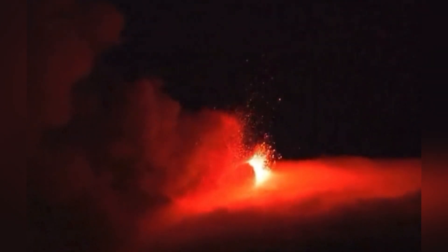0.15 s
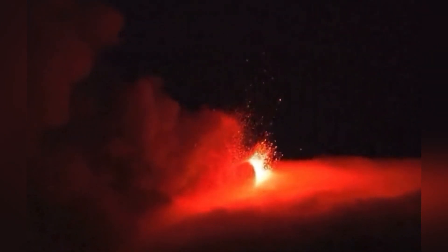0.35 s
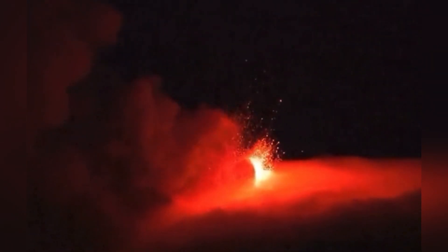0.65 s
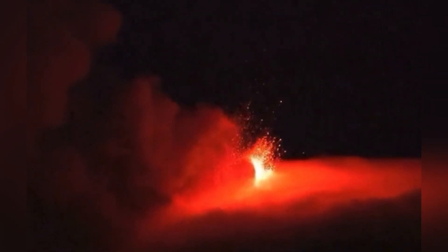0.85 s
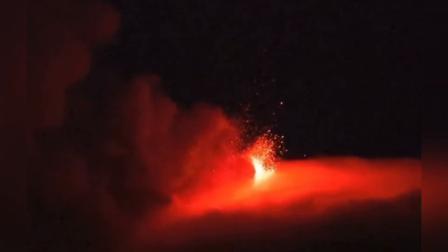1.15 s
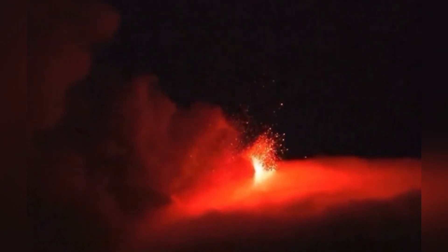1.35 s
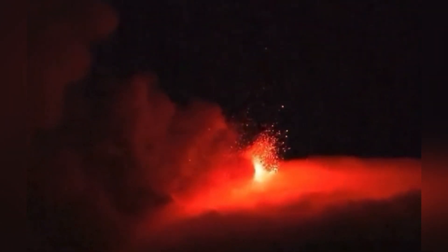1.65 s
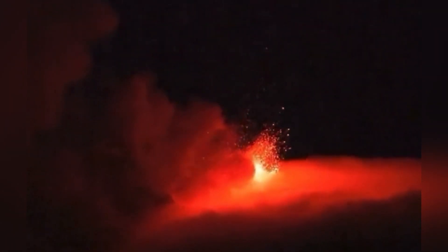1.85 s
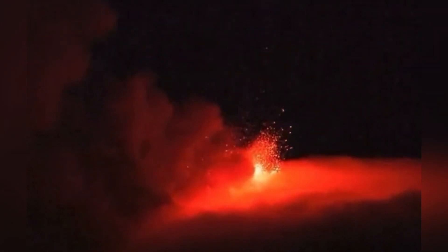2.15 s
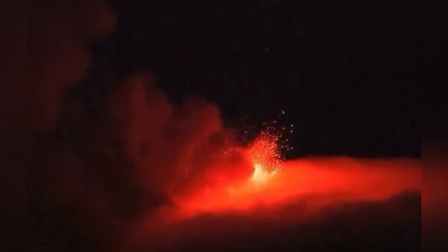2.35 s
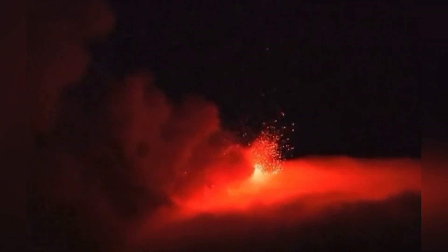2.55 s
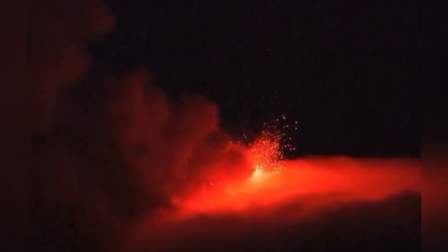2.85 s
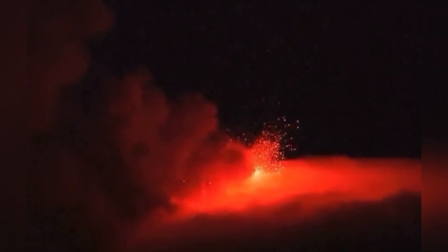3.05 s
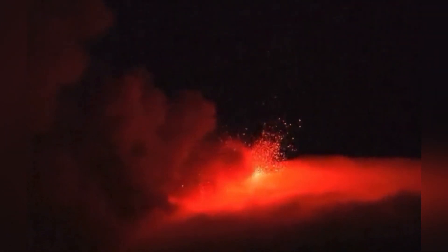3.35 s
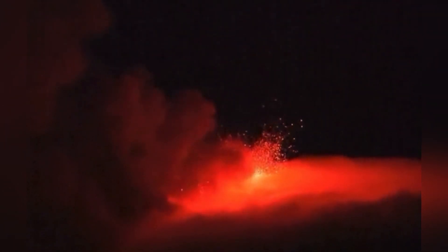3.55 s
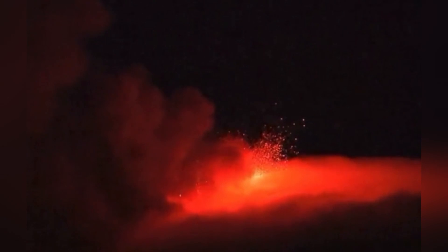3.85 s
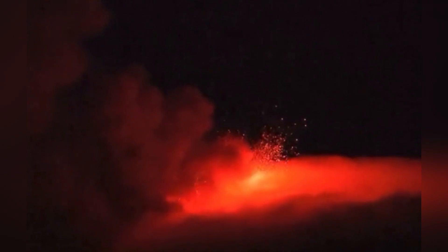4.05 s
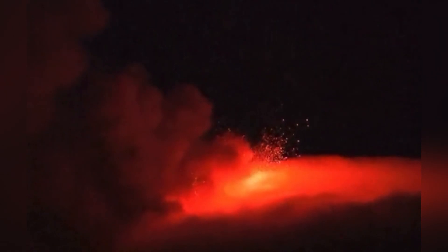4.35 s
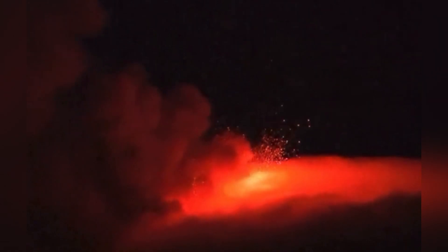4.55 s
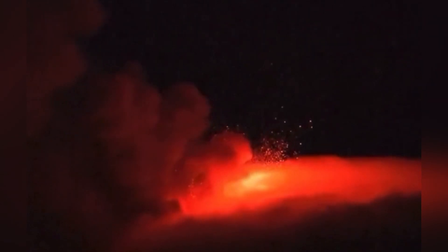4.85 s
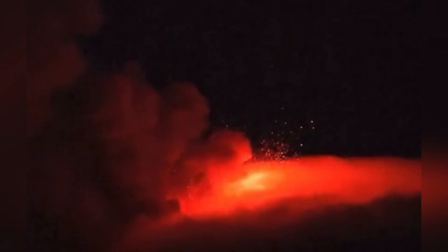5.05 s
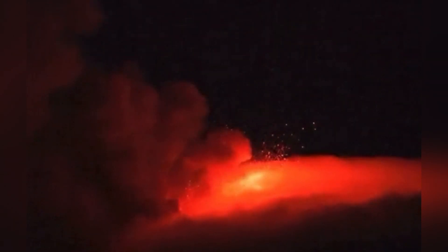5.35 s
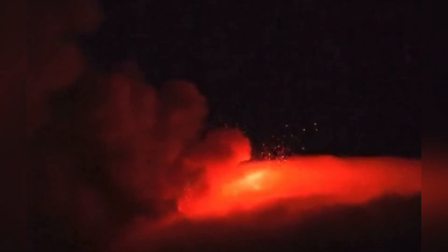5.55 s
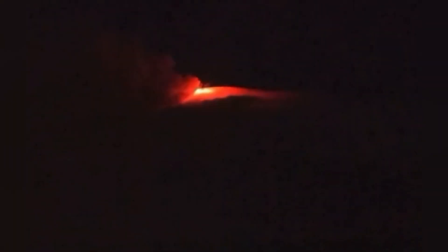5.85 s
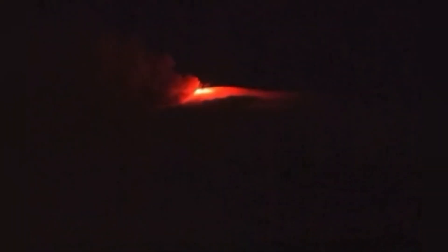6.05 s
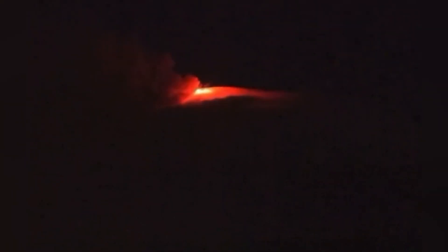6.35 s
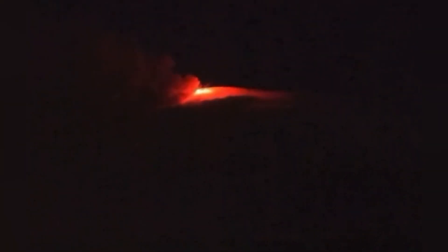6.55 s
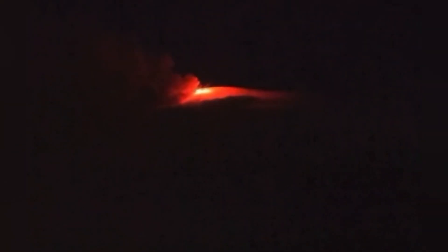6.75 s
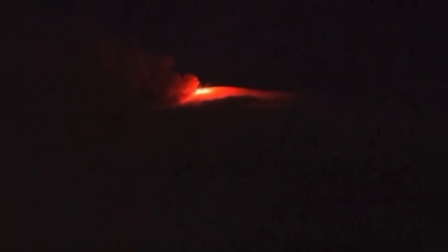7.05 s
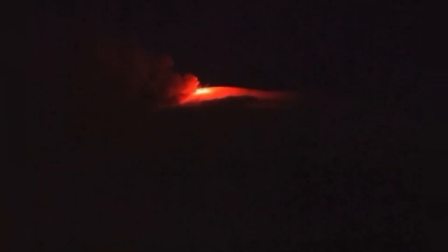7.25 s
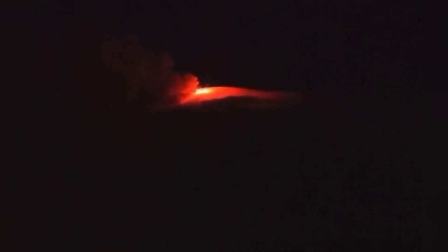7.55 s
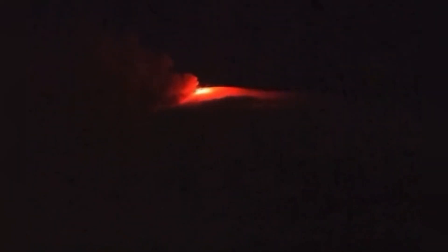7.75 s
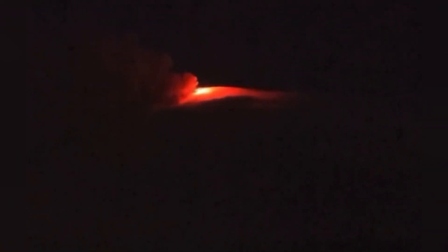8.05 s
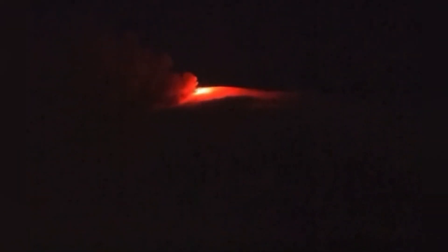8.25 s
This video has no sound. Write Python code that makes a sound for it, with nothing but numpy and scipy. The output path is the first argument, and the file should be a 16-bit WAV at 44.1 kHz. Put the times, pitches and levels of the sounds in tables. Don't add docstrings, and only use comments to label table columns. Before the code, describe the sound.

Low, overloaded wind rumble dominates first, mixed with broad tyre hiss from close passing cars and small road-joint knocks. A heavy diesel slows behind a wall, then pulls clear, brighter and rising in pitch. The sound switches abruptly with a faint click to a smooth, wavering low engine hum fading away, with soft knocks, far dull roar and faint hiss. One handheld camera microphone outdoors, without windshield, with slightly ragged treble.

```python
import sys
import numpy as np
from scipy import signal
from scipy.io import wavfile
from scipy.ndimage import uniform_filter1d

SR = 44100
rng = np.random.default_rng(int(sys.argv[2]) if len(sys.argv) > 2 else 0)


def invert_db(level):
    return 10 ** (np.asarray(level, dtype=float) / 20)


def master(y):
    cut = np.clip(np.atleast_2d(y).T, -1, 1)
    pcm = np.round(cut * 32767)
    wavfile.write(sys.argv[1], SR, pcm.astype(np.int16))


N = 371318
CUT = 5.788


def evened(x):
    return x / np.sqrt(np.mean(x ** 2) + 1e-20)


def columns(rows, t):
    s, *values = np.transpose(rows)
    return [np.interp(t, s, v) for v in values]


def during(rows, fade_in, fade_out):
    t = np.arange(N) / SR
    rise = np.clip((t - rows[0][0]) / fade_in, 0, 1)
    return rise * np.clip((rows[-1][0] - t) / fade_out, 0, 1)


def bump(t, s, half):
    return np.exp(-((t - s) / half) ** 2)


def wander(per_s, count):
    steps = rng.standard_normal(count // 64 + 2)
    slow = signal.sosfilt(signal.butter(2, per_s, fs=SR / 64, output="sos"), steps)
    return np.interp(np.arange(count) / 64, np.arange(len(slow)), evened(slow))


def noise(colour, patchy_db, shape=None, size=1024):
    hop = size // 4
    t = np.arange(N // hop + 5) * hop / SR
    hz = np.fft.rfftfreq(size, 1 / SR)[:, None]
    a, b, patches = rng.standard_normal((len(t), len(hz), 3)).T
    patches = uniform_filter1d(uniform_filter1d(patches, size=8, axis=0), size=10, axis=1)
    patches = patchy_db * evened(patches)
    f, db = np.transpose(colour)
    smooth = np.interp(np.log(hz + 1), np.log(f + 1), db) + (shape(t, hz) if shape else 0)
    loudness = 10 * np.log10((invert_db(smooth + 0 * patches) ** 2).sum(0))
    field = smooth + patches - loudness
    return evened(signal.istft((a + 1j * b) * invert_db(field), nperseg=size, noverlap=size - hop)[1][:N])


def resonate(x, hz, width):
    turn = np.exp(2j * np.pi * hz * np.arange(len(x)) / SR)
    r = np.exp(-np.pi * width / SR)
    return 2 * (turn * signal.lfilter([1 - r], [1, -r], x / turn)).real


def tones(rows, multiples, levels_of, waver_db, drift=1e-4):
    start = round(rows[0][0] * SR)
    t = np.arange(start, min(round(rows[-1][0] * SR), N)) / SR
    hz, *levels_db = columns(rows, t)
    turns = np.cumsum(hz * (1 + drift * wander(30., count=len(t)))) / SR
    out = np.zeros(N)
    for k, db in zip(multiples, levels_of(t, *levels_db)):
        level = np.sqrt(2) * invert_db(db + waver_db * wander(3.7, count=len(t)))
        out[start:][:len(t)] += level * np.sin(2 * np.pi * (k * turns + rng.random()))
    return out


def wind(t):
    # frequency in Hz, density in dB per Hz.
    eddy_colour = [(8.8, -36), (15, -13), (38, 6), (62, 0.5), (93, -7.5), (190, -29), (250, -69),
                   (420, -120)]
    # time in seconds, level in dB.
    breeze_levels = [(0, -30), (.95, -26), (1.2, -31), (2.3, -32), (2.93, -33.5), (3.2, -41.5),
                     (4.6, -40.5), (5, -42), (5.78, -44), (5.8, -40.5), (6.8, -51.5), (8.42, -45)]
    # peak in seconds, level in dB, half length in seconds, upper-bass flutter in dB.
    puffs = [(0, -29, 0.065, 4), (0.15, -25, 0.06, -2), (.255, -19.5, 0.038, 5), (0.466, -23.5, 0.055, 9),
             (.64, -22, 0.077, 7), (0.767, -14, 0.02, -7), (0.886, -23.5, 0.082, -4), (1.01, -26, 0.041, 3),
             (1.45, -24.5, .025, .1), (1.553, -25.5, 0.042, -0.5), (1.725, -29, 0.12, 6),
             (1.888, -26.5, 0.18, -2), (2.127, -31.5, 0.11, 5), (2.372, -28, .05, 3.5),
             (2.528, -19, 0.018, -14), (2.676, -31.5, .05, -8), (2.847, -29.5, 0.037, -9),
             (3.1, -40, .06, -9), (3.4, -37.5, .08, -2), (4.21, -35, 0.036, .1), (4.484, -38, 0.088, -1),
             (4.59, -35.5, 0.068, -7), (5.39, -28.5, 0.092, -1.5), (5.56, -30, 0.14, -5.5),
             (5.706, -30, 0.026, -11), (6.223, -43, .05, -7), (6.66, -37.5, 0.086, 14),
             (8.063, -42, 0.19, 3)]
    breeze_flutter_db = 4

    def strength(s):
        at, db, half, lift_db = np.transpose(puffs)[:, :, None]
        breeze = invert_db(2 * columns(breeze_levels, s)[0])
        gusts = invert_db(2 * db) * bump(s, at, half)
        power = breeze + gusts.sum(0)
        return 10 * np.log10(power), (breeze_flutter_db * breeze + (lift_db * gusts).sum(0)) / power

    def flutter(s, hz):
        return strength(s)[1] * np.exp(-np.log2((hz + 1) / 105) ** 2 / .45)

    eddies = noise(eddy_colour, patchy_db=0.0, shape=flutter, size=4096)
    lumps = np.sqrt(uniform_filter1d(eddies ** 2, size=3000) + 0.042)
    level_db = np.interp(t, t[::64], strength(t[::64])[0]) + 1.5
    return invert_db(level_db) * evened(eddies / lumps ** 0.54)


def cars(t):
    # closest in seconds, tyre noise in dB, distance over speed in seconds,
    # tread hump in Hz, treble lift in dB per octave.
    passes = [
        (.08, -40.5, 0.45, 1245, -1),
        (.58, -42.5, 0.11, 1250, 1),
        (1.25, -45.5, 0.9, 1170, 2.5),
        (1.83, -39.5, 0.38, 1218, 1.5),
        (2.4, -42, 0.19, 1130, 0.8),
        (3.05, -47.5, 0.65, 1000, -3),
        (3.95, -47, .3, 1200, -0.5),
        (4.8, -52, .2, 1600, -3),
    ]
    # frequency in Hz, density in dB per Hz.
    tyre_colour = [(240, -33), (400, -13), (501, -3), (618, -13), (874, -5), (956, 2), (1200, -3),
                   (1410, 1), (1740, -1), (3590, -18), (5220, -27), (11400, -41), (14500, -47)]
    doppler, hump_from_db, hump_per_db, gone_s = 0.075, -45, 2, 4.33

    def traffic(s):
        at, db, scale, hump_hz, lift_db = np.transpose(passes)[:, :, None]
        past = (s - at) / scale
        power = invert_db(2 * db) / (1 + past ** 2) ** 1.61
        share = power / power.sum(0)
        heard_hz = hump_hz * (1 - doppler * past / np.sqrt(1 + past ** 2))
        return 10 * np.log10(power.sum(0)), (share * heard_hz).sum(0), (share * lift_db).sum(0)

    def nearness(s, hz):
        db, hump_hz, lift_db = traffic(s)
        hump_db = np.maximum(hump_per_db * (db - hump_from_db), -4)
        hump = hump_db * np.exp(-((hz - hump_hz) / 120) ** 2)
        return hump + lift_db * np.log2(np.maximum(hz / 1500, 1))

    hiss = noise(tyre_colour, patchy_db=1.04, shape=nearness)
    return invert_db(traffic(t)[0]) * hiss * np.clip((gone_s - t) / 0.44, 0, 1)


def tappets(t):
    # ring in Hz, width in Hz, level in dB.
    head_rings = [(5030, 1400, -2), (7430, 760, -9), (4120, 730, -7)]
    tick_s, ticks_per_s = 1.667, 39.9
    near_s, half_s, level_db = 1.7, 0.87, -63
    turns = (t - tick_s) * ticks_per_s
    size = invert_db(3.0 * rng.standard_normal(600))[np.floor(turns).astype(int) + 100]
    puffs = size * np.exp(-(turns % 1) / 0.33) * rng.standard_normal(N)
    rings = sum(invert_db(db) * resonate(resonate(puffs, hz, w), hz, w) for hz, w, db in head_rings)
    return invert_db(level_db) * bump(t, near_s, half_s) * evened(rings)


def lorry(t):
    # time in seconds, firing rate in Hz.
    speed = [
        (2.9, 48.76),
        (3.33, 46.88),
        (3.65, 45.6),
        (4.4, 44.8),
        (5.1, 47.4),
        (5.55, 50.2),
        (5.788, 51.8),
    ]
    # order, level in dB, growth in dB per second as it nears.
    exhaust_orders = [(1, -35.5, 1.7), (2, -45.5, 1), (4, -52, 0.5)]
    # time in seconds, clatter in dB.
    clatter_levels = [(3.3, -64), (3.6, -72), (3.8, -55), (4.3, -53), (4.67, -47.5), (5.2, -46),
                      (5.788, -48)]
    # frequency in Hz, density in dB per Hz.
    block_colour = [(400, -4), (600, -20.5), (1000, -8.5), (1500, -5), (2300, -7.5), (3500, -11.5),
                    (4450, -13), (4800, -20), (6300, -22.5), (7900, -25.5), (9000, -28.5), (11000, -30.5),
                    (13500, -31.5), (15000, -42)]
    # frequency in Hz, width in Hz, lift in dB.
    panels = [(757, 22.6, 22.5), (1600, 49, -1), (2126, 57, 7.5), (2970, 120, 0), (3560, 180, 2),
              (4330, 64, 5), (5540, 200, 6.5), (6900, 158, 4)]
    # time in seconds, frequency in Hz, level in dB.
    moan_path = [(4.35, 79.2, -52), (4.788, 80.9, -34.5), (4.92, 86.6, -49), (5.058, 89.1, -47),
                 (5.15, 89.9, -52)]
    # time in seconds, turbo whine in Hz.
    turbo = [(2.7, 9420), (3.1, 9650), (4.5, 9715), (4.65, 9790), (5.1, 10280), (5.43, 10560),
             (5.62, 10980), (5.788, 11480)]
    # frequency in Hz, width in Hz, level in dB, centre in seconds, half length in seconds.
    loose_covers = [(1590, 46, -57, 4.26, 0.55), (755, 50, -58, 5.46, .5), (2110, 51, -64, 4.9, 0.21)]
    coast_s, coast_half_s, coast_db = 3.55, 0.48, 8
    shift_s, shift_half_s, shift_db = 5.51, 0.1, -15
    emerge_s, emerge_span_s = 4.4, 0.16
    hidden_db, seen_db = -15, 0.5
    whine_hidden_db, whine_seen_db, whine_lag_s = -90, -70.5, .1

    def pipe(s):
        first, second, fourth = [db + growth * (s - emerge_s) for _, db, growth in exhaust_orders]
        first = first + shift_db * bump(s, shift_s, shift_half_s)
        return first, second, fourth + coast_db * bump(s, coast_s, coast_half_s)

    def seen(s):
        return .5 + .5 * np.tanh((s - emerge_s) / emerge_span_s)

    def sight(s, f):
        gap = np.interp(f, (4200, 4900, 6900, 7400, 7800, 8400), (0, .6, .7, .25, .25, .7))
        return (hidden_db + (seen_db - hidden_db) * seen(s)) * gap

    def spool(s):
        return [whine_hidden_db + (whine_seen_db - whine_hidden_db) * seen(s - whine_lag_s)]

    exhaust = tones(speed, (1, 2, 4), pipe, waver_db=1.5, drift=0.0072) * during(speed, 0.25, 0.0014)

    turns = np.cumsum(columns(speed, t)[0]) / SR
    uneven_db = 1.8 * rng.standard_normal(600) + .8 * (-1.) ** np.arange(600)
    strength = invert_db(uneven_db)[turns.astype(int)]
    gate = 1.32 + strength * np.sin(np.pi * (turns % 1) ** 0.84) ** 2
    heard = slice(round(clatter_levels[0][0] * SR), round(CUT * SR))
    knock = (gate * noise(block_colour, patchy_db=1.6, shape=sight, size=512))[heard]
    ringing = sum(invert_db(db - 6.5) * resonate(knock, f, w) for f, w, db in panels)
    clatter = np.zeros(N)
    clatter[heard] = evened(knock + ringing)
    clatter *= invert_db(columns(clatter_levels, t)[0] + 5.5) * during(clatter_levels, 0.85, 1e-3)

    moan = tones(moan_path, [1], lambda s, db: [db], waver_db=3.5) * during(moan_path, 0.089, 0.096)
    whine = tones(turbo, [1], spool, waver_db=5.0, drift=0.00234) * during(turbo, .2, 1e-3)

    cover = np.zeros(N)
    for f, w, db, s, half in loose_covers:
        cover[heard] += invert_db(db) * evened(resonate(knock, f, w)) * bump(t[heard], s, half)
    return exhaust + clatter + moan + whine + cover * during(clatter_levels, .1, 1e-3)


def drone():
    # time in seconds, base rate in Hz, load in dB.
    path = [
        (5.788, 34.4, 4),
        (5.95, 33.64, 0.8),
        (6.26, 34.3, -2.5),
        (6.5, 34.78, 0),
        (6.95, 36.14, -9.5),
        (7.3, 34.72, -9.5),
        (7.46, 33.28, 2),
        (7.7, 31.9, -4),
        (8.47, 33.4, -1.5),
    ]
    # order, level in dB, share of load.
    strong_orders = [(2, -31, .1), (3, -50.5, .4), (5, -34.5, 1.1)]
    recede_db_per_s = [-2.5, -.5, -3.5]
    # order, dB relative to order 2.
    weak_orders = [(1.5, -11), (4, -19), (6, -20), (7, -18), (9, -25)]
    pull_s, pull_half_s, pull_db = 6.5, 0.58, 12

    def orders(s, load_db):
        second, third, fifth = [db + share * load_db + fade * (s - CUT)
                                for (_, db, share), fade in zip(strong_orders, recede_db_per_s)]
        return second, third + pull_db * bump(s, pull_s, pull_half_s), fifth

    def faint(s, load_db):
        return [orders(s, load_db)[0] + db for _, db in weak_orders]

    strong = tones(path, (2, 3, 5), orders, waver_db=0.1)
    weak = tones(path, [k for k, _ in weak_orders], faint, waver_db=-2.0)
    return (strong + invert_db(-3.0) * weak) * during(path, 0.0039, 1e-4)


def knocks():
    # start in seconds, peak in dB, ring in Hz, 60 dB decay in seconds.
    joints = [
        (2.283, -28, 340, 0.064),
        (2.628, -31, 900, 0.045),
        (3.066, -28.5, 860, 0.019),
        (7.193, -31, 1055, .04),
        (7.441, -36, 1110, 0.061),
        (7.472, -33, 1450, .02),
        (7.474, -42, 2220, .015),
    ]
    out, age = np.zeros(N), np.arange(5000) / SR
    for s, db, hz, t60 in joints:
        ring = invert_db(db - 60 * age / t60) * np.sin(2 * np.pi * hz * age)
        out[round(s * SR):][:5000] += ring * np.minimum(age / 0.0017, 1)
    return out


def roar(t):
    # time in seconds, level in dB.
    swell = [(0, -47.5), (1, -48), (1.8, -46), (2.45, -45), (3.6, -46.5), (5.2, -43.5), (5.8, -43),
             (6.3, -46), (6.8, -47), (7.25, -43.5), (8, -47.5), (8.42, -48)]
    # frequency in Hz, density in dB per Hz.
    far_colour = [(53, -43.5), (90, -2), (97, -2.5), (167, -8.5), (204, -8.5), (328, -14), (464, -17),
                  (894, -18), (1170, -19.5), (1600, -26.5), (2260, -31.5), (3030, -39), (7000, -70.5),
                  (9100, -101), (15400, -120)]
    mid_db, bass_per_db, treble_lift_db = -45, 0.82, 1.5
    far_bass_db, far_treble_db, far_dulling_per_s = -2, 0, -2.36

    def tilt(s, hz):
        bass_db = bass_per_db * (columns(swell, s)[0] - mid_db) + far_bass_db * (s > CUT)
        treble_db = np.where(s > CUT, far_treble_db + far_dulling_per_s * (s - CUT), treble_lift_db)
        bass = bass_db * np.log2(np.clip(500 / (hz + 1), 1, 3))
        return bass + treble_db * np.log2(np.clip(hz / 1200, 1, 4))

    return invert_db(columns(swell, t)[0] + 5.0) * noise(far_colour, patchy_db=0.56, shape=tilt, size=2048)


def preamp_hiss():
    # frequency in Hz, density in dB per Hz.
    hiss_colour = [(2350, -6.5), (4000, -7), (5250, -10), (7070, -14.5), (12400, -15.5), (13500, -15),
                   (15000, -30)]
    return invert_db(-68.5) * noise(hiss_colour, patchy_db=1.3)


def ragged_treble(x):
    # frequency in Hz, share in dB.
    weakest = [(6000, -13), (8000, -4), (10500, -1), (13000, 0), (15000, 2)]
    # time in seconds, edge in Hz.
    top_edge = [(0, 13000), (1.17, 13500), (1.75, 12700), (3.05, 13400), (4.62, 13700), (4.92, 14300),
                (5.79, 12600), (7.05, 13500)]
    # start in seconds, length in seconds.
    splurges = [(.2, .12), (.62, .28), (2.51, .05), (6.26, .1)]
    hz, s, z = signal.stft(x[0], SR, nperseg=1152, noverlap=576)
    power = uniform_filter1d(uniform_filter1d(abs(z) ** 2, size=4, axis=0), size=2, axis=1)
    around = uniform_filter1d(power, size=45, axis=0)
    share_db = np.interp(hz, *np.transpose(weakest), left=-99)
    strong = power > around * invert_db(2 * share_db)[:, None]
    starts, edge_hz = np.transpose(top_edge)
    held_hz = edge_hz[np.searchsorted(starts, s, "right") - 1]
    rich = sum((s >= at) & (s < at + length) for at, length in splurges) > 0
    wobble = np.repeat(rng.exponential(1, len(s) // 3 + 1), 3)[:len(s)]
    top_hz = np.where(rich, 15200, held_hz) - 500 * np.floor(np.minimum(.9 * wobble, 2))
    kept = z * strong * (hz[:, None] < top_hz)
    return signal.istft(kept, SR, nperseg=1152, noverlap=576)[1][None, :N]


def scene():
    t = np.arange(N) / SR
    mix = wind(t) + roar(t) + cars(t) + lorry(t) + drone() + knocks() + tappets(t)
    return (mix * np.clip(np.minimum(t, t[-1] - t) / .003, 0, 1))[None]


def roll_off(x):
    return signal.sosfilt(signal.butter(12, 15340, fs=SR, output="sos"), x)


def record(dry):
    click = invert_db(-37.) * (np.arange(N) == round((CUT - 1e-3) * SR))
    return roll_off(ragged_treble(dry + preamp_hiss()) + click)


dry = scene()
out = record(dry)
master(out)
```